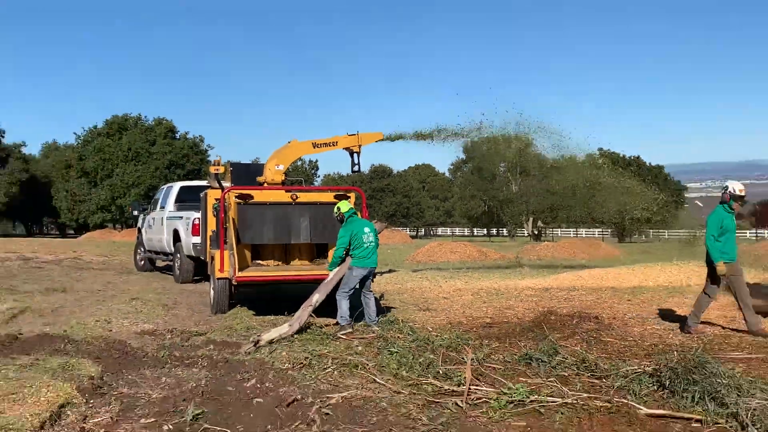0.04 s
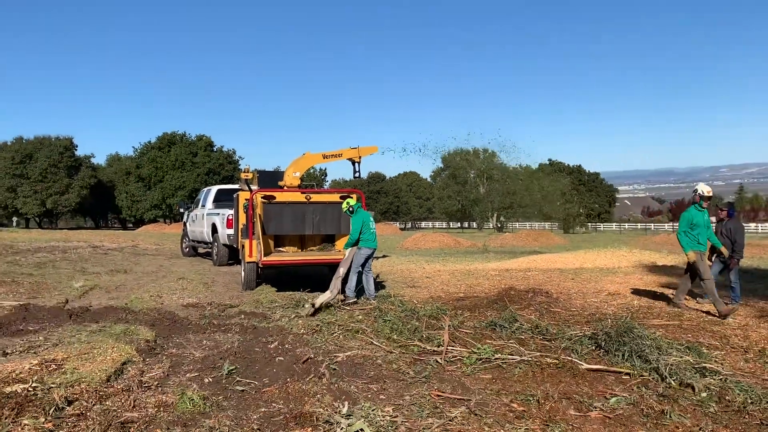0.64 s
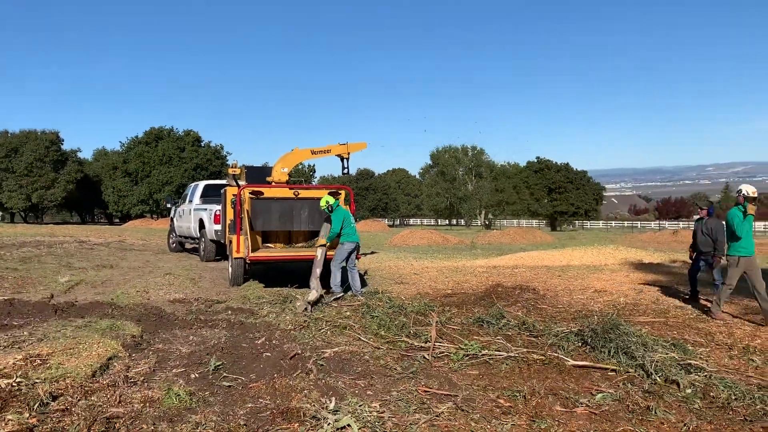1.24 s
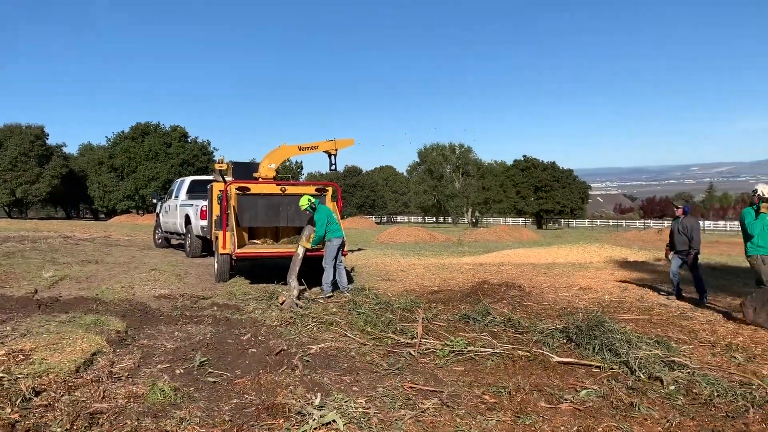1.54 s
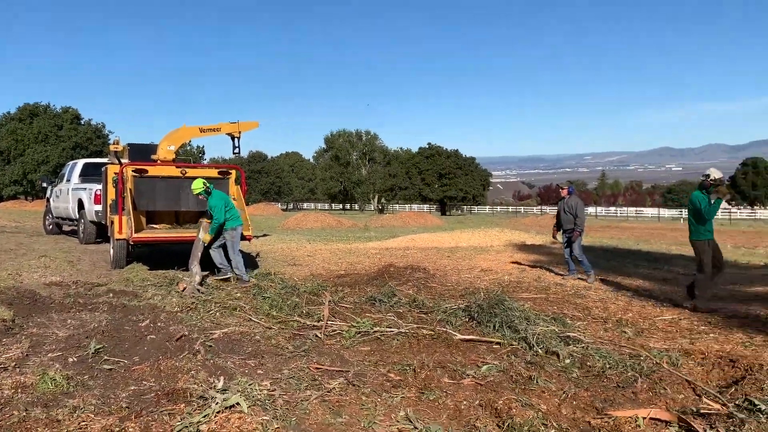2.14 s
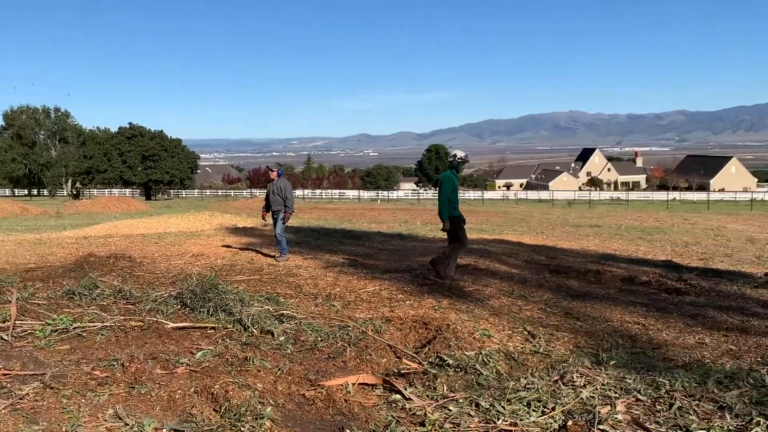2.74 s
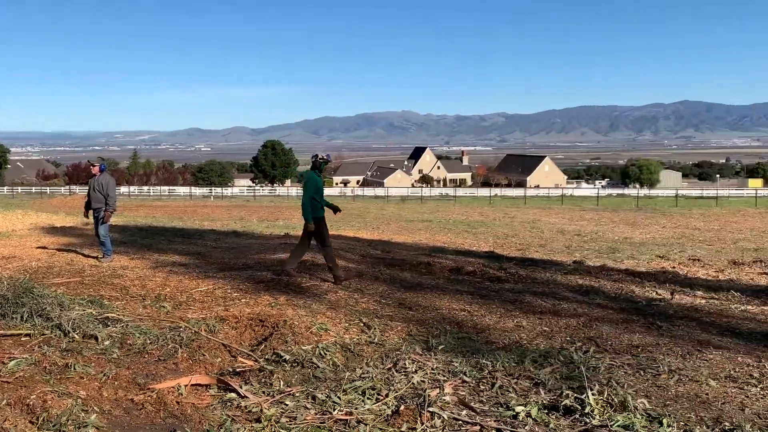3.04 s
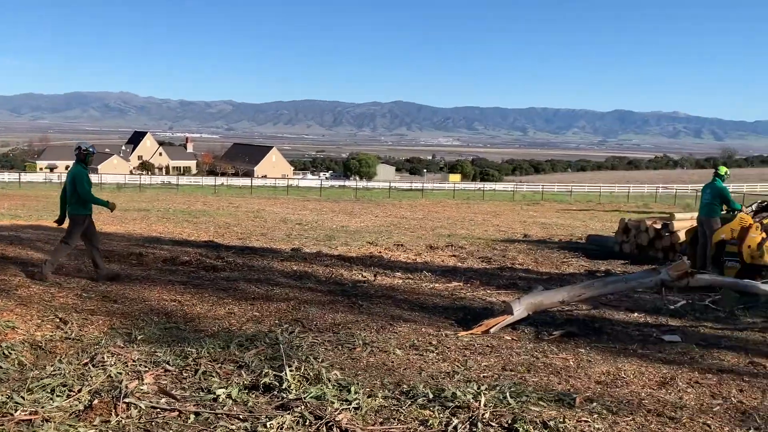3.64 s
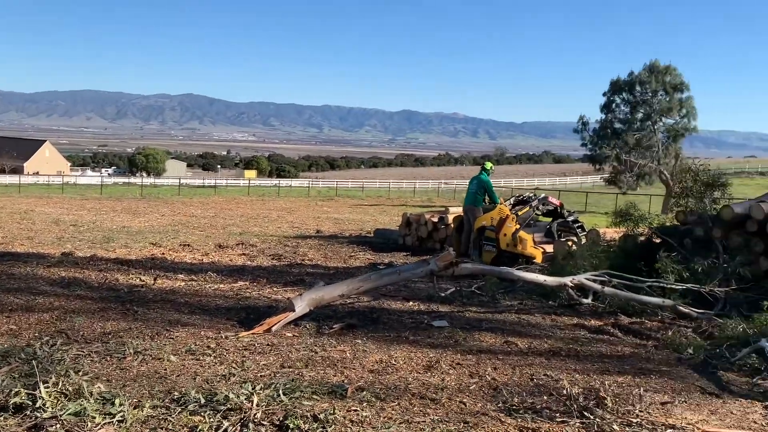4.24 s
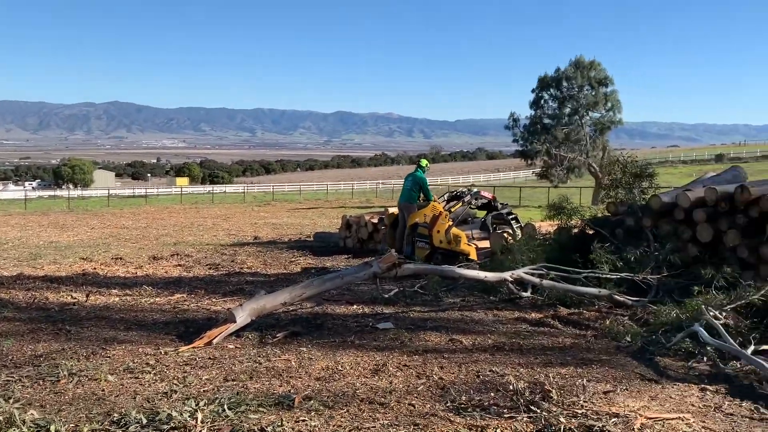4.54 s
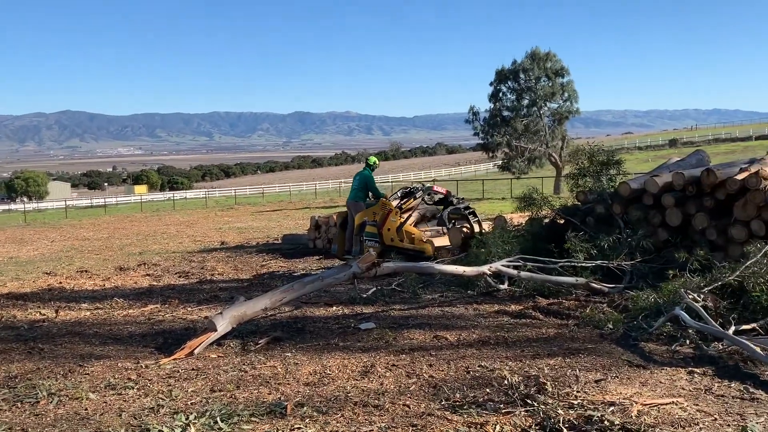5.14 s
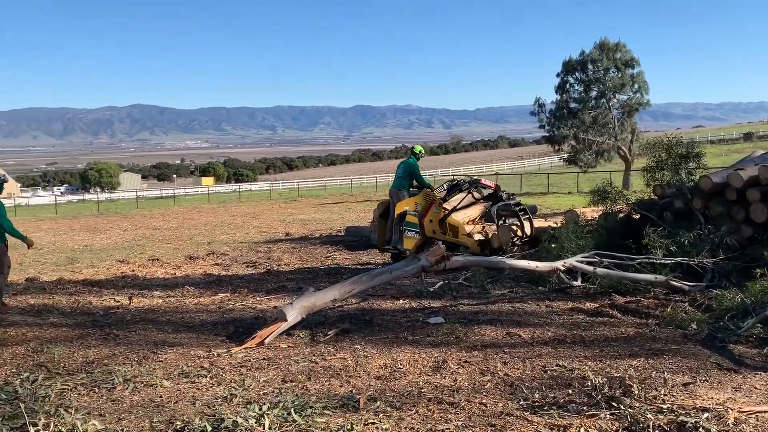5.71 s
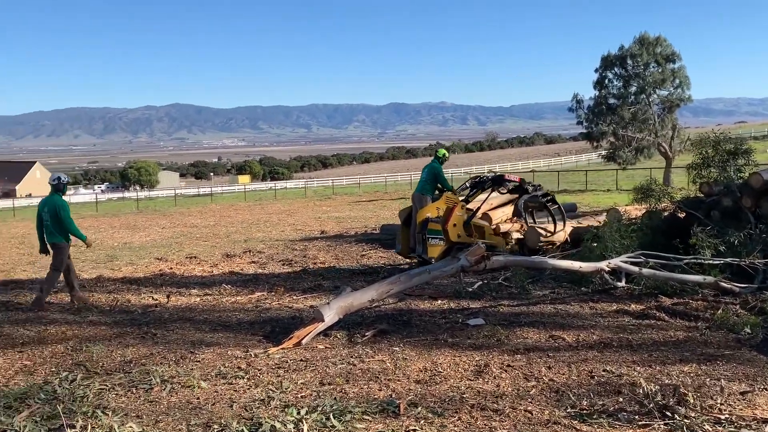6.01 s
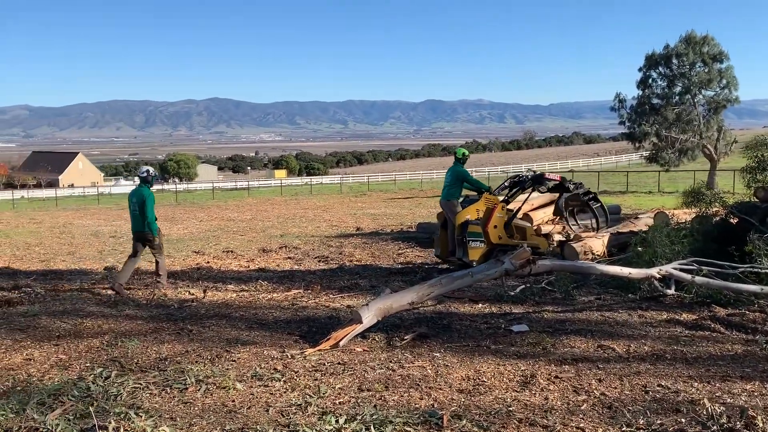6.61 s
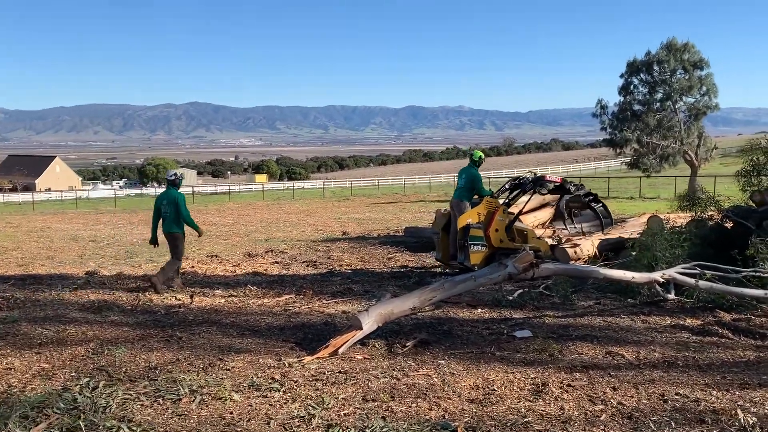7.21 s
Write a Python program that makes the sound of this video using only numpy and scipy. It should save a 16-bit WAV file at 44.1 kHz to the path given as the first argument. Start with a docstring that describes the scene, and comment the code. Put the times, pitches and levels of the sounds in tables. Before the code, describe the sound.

A diesel wood chipper drones steadily outdoors, briefly shredding wood, while a small loader growls, clanks and knocks logs together.

```python
"""A diesel wood chipper runs in an open field: its exhaust drones, its engine knocks, its fan hums
and its panels rattle. The last chips hiss out of the chute, wood is shredded, and twigs crackle.
A small loader works nearby, growling, clanking and knocking logs together, then drives closer.
The listener turns to the right, away from the chipper, so its sound reaches the right ear
later and later."""
import sys
import numpy as np
from scipy import signal
from scipy.fft import rfft, irfft
from scipy.io import wavfile

SR = 44100
rng = np.random.default_rng(int(sys.argv[2]) if len(sys.argv) > 2 else 0)


def bounce(signal):
    """Save signal as a 16-bit WAV file at the path given by the first command-line argument."""
    frames = np.transpose(np.atleast_2d(signal))
    limited = np.clip(frames, -1, 1)
    pcm = np.round(limited * 32767).astype(np.int16)
    wavfile.write(sys.argv[1], SR, pcm)


N = 320607
TIME = np.arange(N) / SR
FREQS = np.maximum(np.arange(N // 2 + 1) * SR / N, 1)

# how hard each of the chipper's four cylinders fires: level/dB
CYLINDER_FORCE = [4.9, 2, 2.3, 0.59]
# tone colour of dry wood snapping: f/Hz, level/dB
SNAP_COLOUR = [(800, -2), (2500, 17), (6000, 4), (10000, 10.5), (14000, 0)]

TURN_AT_S, TURN_EASE_S = 2.66, 0.27   # middle of the listener's turn, and how gradual it is
FACE_AT_S, FACE_EASE_S = 4.17, 0.064   # the turn ends facing the loader
DRIVE_AT_S, DRIVE_EASE_S = 5.3, 0.059   # the loader drives off towards the listener


def from_db(db):
    """Turn decibels into a gain."""
    return 10 ** (np.asarray(db) / 20)


def rms_one(x):
    """Scale a signal to an average strength (rms) of 1."""
    return x / np.sqrt(np.mean(x ** 2) + 1e-20)


def over_hz(points, at_hz=FREQS):
    """Join a table's points by straight lines along a pitch scale."""
    hz, value = np.transpose(points)
    return np.interp(np.log(at_hz), np.log(hz), value)


def in_time(rows, time=TIME):
    """Join each column of a table by straight lines in time."""
    row_s, *columns = np.transpose(rows)
    return [np.interp(time, row_s, column) for column in columns]


def step(at_s, ease_s, time=TIME):
    """A smooth change from 0 to 1, half done at at_s."""
    return .5 + .5 * np.tanh((time - at_s) / (2 * ease_s))


def hump(at_s, half_s, time=TIME):
    """A smooth rise and fall of height 1."""
    return np.exp(-np.square((time - at_s) / half_s))


def swell(at_s, rise_s, decay_s):
    """A quick rise that peaks at at_s and dies away."""
    return np.exp(-np.maximum((at_s - TIME) / rise_s, 0) ** 2 - np.maximum(TIME - at_s, 0) / decay_s)


def tone(cycles):
    """A pure tone of rms 1 that follows a running count of cycles."""
    return np.sqrt(2) * np.cos(2 * np.pi * cycles)


def colour(x, spectrum):
    """Filter a sound by a table of f/Hz, level/dB."""
    return irfft(rfft(x) * from_db(over_hz(spectrum)), N)


def resonate(x, modes):
    """Make a sound ring at a body's own notes, added with alternating signs; rms 1."""
    rings = (from_db(db) * signal.lfilter(*signal.iirpeak(hz, hz / width, fs=SR), x)
             for hz, width, db in modes)
    return rms_one(sum((-1) ** k * ring for k, ring in enumerate(rings)))


def drift(rate_hz):
    """A random wander of rms 1 that changes up to about rate_hz times a second."""
    return rms_one(irfft(rfft(rng.standard_normal(N)) / (1 + (FREQS / rate_hz) ** 2), N))


def wavering():
    """Moving air makes a far tone swell and sink."""
    return 1 + .3 * drift(3)


def grains(per_s, spread_db, length_s):
    """The loudness outline of many tiny impacts of uneven size; rms 1."""
    sizes = from_db(spread_db * np.minimum(rng.exponential(1, N), 4))
    power = (sizes * (rng.random(N) < per_s / SR)) ** 2
    fading = signal.lfilter([1], [1, -np.exp(-1 / (length_s * SR))], power + 1e-18)
    return rms_one(np.sqrt(fading))


def air_noise():
    """White noise at two ears; sound scattered by the ground makes them less alike in the treble."""
    # share of the sound that arrives directly: f/Hz, left-right likeness/0-1
    likeness = [(40, 1), (150, .95), (450, .87), (750, .82), (1200, .88), (2300, .86), (2750, .66),
                (3200, .8), (4300, .84), (4900, .45), (5500, .5), (7500, .12), (14000, .15)]
    alike = over_hz(likeness)
    mid, side = rfft(rng.standard_normal((2, N)))
    ears = np.sqrt(1 + alike) * mid + np.sqrt(1 - alike) * side * [[1], [-1]]
    return irfft(ears, N) * np.sqrt(SR) / 2


def turned(time=TIME):
    """How far the listener has turned, from 0 to 1."""
    return step(TURN_AT_S, TURN_EASE_S, time)


def driven_s():
    """Seconds for which the loader has been driving nearer."""
    return np.maximum(TIME - DRIVE_AT_S, 0)


def layer_db(start_db, turn_db, drive_db, db_per_s):
    """A level that shifts as the listener turns, as the loader sets off, and as it nears."""
    driving = step(DRIVE_AT_S, DRIVE_EASE_S)
    return start_db + turn_db * turned() + drive_db * driving + db_per_s * driven_s()


def litter():
    """Dry leaves and bark crackle as they land or are driven over."""
    # spells of crackling: t/s, half length/s, level/dB
    spells = [(.12, 0.39, -52), (5.48, 0.4, -56), (7.0, .38, -52.5)]
    level = sum(from_db(db) * hump(at, half_s) for at, half_s, db in spells)
    cracks = grains(per_s=400, spread_db=2, length_s=.002)
    return level * rms_one(colour(air_noise() * cracks, SNAP_COLOUR))


def twigs(rise_s=0.0036, decay_s=0.016):
    """Each twig snaps in a short cluster of breaking fibres."""
    # the snaps: t/s, level/dB
    snaps = [(0.801, -44), (1.336, -43), (1.747, -47), (2.18, -50), (2.793, -49), (3.548, -50), (5.28, -46),
             (5.4, -52), (5.534, -44), (5.603, -47), (6.014, -50), (6.06, -42), (6.863, -48.5),
             (6.952, -54.5)]
    level = sum(from_db(db) * swell(at, rise_s, decay_s) for at, db in snaps)
    breaks = grains(per_s=2500, spread_db=1.5, length_s=.001)
    return level * rms_one(colour(air_noise() * breaks, SNAP_COLOUR))


def logs(rise_s=0.0011):
    """Logs knock together at the loader and ring, hollow and brief."""
    # the knocks: t/s, level/dB
    knocks = [(2.77, -36), (3.648, -40), (5.978, -37), (6.134, -27), (6.145, -22.5)]
    # a log's own notes: f/Hz, time to fade by 60 dB/s, level/dB
    log_notes = [(829, .05, 0), (935, .025, -5), (1360, .04, -5), (1760, .03, -7)]
    since = TIME[:SR // 4]
    out = np.zeros(N + SR)
    for at, db in knocks:
        ring = sum(from_db(db + note_db - 60 * since / fade_s) * tone(hz * since + rng.random())
                   for hz, fade_s, note_db in log_notes)
        start = int(at * SR)
        out[start:start + len(since)] += ring * (1 - np.exp(-since / rise_s))
    return out[:N]


def loader_clanks(rise_s=.016, decay_s=.03):
    """The loader's steel panels knock together as it jerks into motion."""
    # the clanks: t/s, level/dB
    clanks = [(5.238, -33), (5.292, -38), (5.99, -43), (6.75, -42)]
    # ring of a clank: f/Hz, width/Hz, level/dB
    clank_ring = [(1900, 260, 0), (2400, 350, 0), (3000, 450, -6)]
    level = sum(from_db(db) * swell(at, rise_s, decay_s) for at, db in clanks)
    return level * resonate(air_noise(), clank_ring)


def loader_growl(firings, throb=0.42, nearing_db_per_s=1):
    """Exhaust puffs growl through the loader's silencer and boom in its pipe under load."""
    # the loader takes up load: t/s, half length/s, effort/0-1
    lifts = [(3.794, 0.36, 0.3), (6.733, 0.15, 0.91), (7.1, 0.14, 0.87)]
    # ring of the silencer and of the pipe: f/Hz, width/Hz, level/dB
    silencer_ring = [(418, 167, -7.5), (611, 113, 0), (684, 99, -1.5)]
    pipe_ring = [(207, 32, -8.5), (247, 12, -8.5)]
    effort = sum(strength * hump(at, half_s) for at, half_s, strength in lifts)
    puffs = air_noise() * (1 + throb * tone(firings))
    growl_db = -37.5 + 2.5 * effort + nearing_db_per_s * driven_s()
    boom = from_db(-29) * effort * resonate(puffs, pipe_ring)
    return from_db(growl_db) * resonate(puffs, silencer_ring) + boom


def loader_pump():
    """The hydraulic pump's hum rises and falls as it speeds up and slows."""
    # the pump's note: t/s, f/Hz, level/dB
    pump_note = [(2.8, 302.8, -41), (3.2, 307, -35), (3.55, 332, -40), (3.9, 334, -45), (4.3, 307.4, -38),
                 (4.65, 323.7, -35), (5.4, 317.8, -34.5), (5.8, 324.4, -34), (6.1, 331, -38),
                 (6.45, 322.4, -35), (6.9, 332, -50), (7.12, 325.2, -32), (7.27, 314, -36)]
    hz, db = in_time(pump_note)
    return from_db(db) * tone(np.cumsum(hz + drift(16)) / SR)


def loader(turns, tone_db, beat_hz=1.965, beat_at_s=.122):
    """Its engine fires a little faster than the chipper's, so the two throb against each other."""
    firings = 2 * turns + beat_hz * (TIME - beat_at_s) + 0.022 * drift(8.4)
    engine = from_db(-32.5) * tone(firings) + from_db(-48.5) * tone(3 * firings)
    working = loader_growl(firings) + loader_pump()
    return engine * from_db(tone_db) + turned() ** 2 * working


def panel_rattle():
    """Loose panels chatter on the chipper, heard after the turn and growing louder."""
    # ring of the panels: f/Hz, width/Hz, level/dB
    panel_ring = [(1706, 44, 4.5), (1960, 340, 4), (2530, 450, 4.5), (4020, 250, -5.5)]
    taps = grains(per_s=260, spread_db=1.3, length_s=.004) * from_db(1.3 * drift(15))
    level = from_db(-48 + 5 * step(DRIVE_AT_S, DRIVE_EASE_S)) * turned() ** 4
    return level * taps * resonate(air_noise(), panel_ring)


def overspeed(start_hz=.66, swing_s=4.1, settle_s=1.35):
    """The chipper's extra turns per second, which its speed governor pulls back in a fading swing."""
    return start_hz * np.exp(-TIME / settle_s) * np.cos(2 * np.pi * TIME / swing_s)


def chips_left():
    """The flow of chips, falling to 0 as the last ones leave the chute."""
    return 1 - step(at_s=0.085, ease_s=0.12)


def draught():
    """With the chips gone, the drum blows a thin, gusty hiss out of the chute."""
    # tone colour of the whistling air: f/Hz, level/dB
    whistle_colour = [(4500, -20), (5600, -3), (6300, 19), (7400, 17), (8600, -20)]
    level = from_db(-56 + 1.1 * drift(9)) * hump(at_s=1.7, half_s=0.54)
    return level * rms_one(colour(rng.standard_normal(N), whistle_colour))


def chip_ticks(rise_s=0.0068, decay_s=0.014):
    """Stray chips ping off the chute's steel lip."""
    # the hits: t/s, level/dB
    hits = [(.115, -43), (.225, -46)]
    # ring of the lip: f/Hz, width/Hz, level/dB
    lip_ring = [(3300, 400, -15), (4740, 280, 9.5)]
    level = sum(from_db(db) * swell(at, rise_s, decay_s) for at, db in hits)
    return level * resonate(air_noise(), lip_ring)


def chute(patter_share=0.27):
    """Air rushes from the chute, with chips and leaves pattering in it."""
    # tone colour of the rushing air: f/Hz, level/dB
    hiss_colour = [(1500, -100), (3200, -91.5), (4100, -95.5), (5200, -91), (6300, -90), (7500, -98),
                   (9500, -96), (13500, -102), (15000, -108)]
    chips = grains(per_s=350, spread_db=2.5, length_s=.001)
    patter = np.sqrt(1 - patter_share + patter_share * chips ** 2)
    level_db = layer_db(0.15, turn_db=.1, drive_db=1.5, db_per_s=0.21) + 13.5 * chips_left()
    return from_db(level_db + 0.17 * drift(13)) * colour(air_noise() * patter, hiss_colour)


def rumble():
    """The machines' deep noise, stronger while chips still leave the chute."""
    # tone colour of the rumble: f/Hz, level/dB
    rumble_colour = [(20, -99), (32, -90), (45, -71), (58, -50), (85, -55.5), (140, -49.5), (240, -56),
                     (325, -57.5), (420, -66), (700, -82.5), (2000, -110)]
    level_db = layer_db(-0.84, turn_db=1.4, drive_db=0.68, db_per_s=0.84) + 4 * chips_left()
    return from_db(level_db) * colour(air_noise(), rumble_colour)


def fan(turns, blades_per_turn=9.454):
    """The belt-driven fan hums as its blades pass; its overtones dull as the listener turns."""
    # the hum swells and sinks: t/s, level/dB
    hum_level = [(0, -36.5), (.97, -43), (1.13, -35), (1.76, -37.5), (1.9, -39), (2.08, -38), (2.55, -34),
                 (2.75, -43), (3.58, -38.5), (3.74, -32), (3.96, -30.5), (4.06, -41.5), (7.27, -37)]
    # the fan's overtones: multiple of the blade rate, level/dB
    fan_overtones = [(2, -46), (3, -45.5), (5, -52)]
    blades = blades_per_turn * turns
    hum_db, = in_time(hum_level)
    tilt_db = -2.5 * turned()
    overtones = sum(from_db(db + tilt_db * (k - 3)) * tone(k * blades + rng.random()) * wavering()
                    for k, db in fan_overtones)
    return from_db(hum_db) * tone(blades) + overtones


def drum(turns):
    """The cutting drum whines in step with the engine at first, while it runs fast and empty."""
    whine = tone(32 * turns) + from_db(-7) * tone(24 * turns)
    return from_db(-41.5) * (1 - step(at_s=.68, ease_s=.06)) * whine * wavering()


def cracking_bursts(bright_s=0.065):
    """Rough cracking: wood shredded early on, later the crunch of a clank and of logs knocking."""
    # the bursts: t/s, rise/s, decay/s, level/dB, bright cracks against the ring/dB
    bursts = [(.115, .012, .025, -39, -7), (1.316, .013, .045, -29.5, -5), (1.335, .014, .09, -29, -11),
              (1.4, .03, .06, -35.5, -13), (1.612, .016, .075, -34.5, -10), (5.238, .015, .06, -40, -5),
              (5.98, .01, .02, -40, -8), (6.142, .012, .025, -33.5, -8)]
    # tone colour of the bright cracks: f/Hz, level/dB
    crack_colour = [(300, -13), (750, 11.5), (1700, 3), (2900, 6.5), (4200, 11), (5400, 1.5), (6600, 4),
                    (8000, -6.5), (10000, 1), (15000, -32)]
    # ring of the drum's steel hood, used for every burst: f/Hz, width/Hz, level/dB
    burst_ring = [(520, 260, -6), (895, 110, 2.5), (1270, 270, -1.5), (1660, 450, 0.5), (2450, 210, -5)]
    crunch = air_noise() * grains(per_s=1500, spread_db=2, length_s=.0015)
    cracks = rms_one(colour(crunch, crack_colour))
    ring = resonate(crunch, burst_ring)
    out = np.zeros((2, N))
    for at, rise_s, decay_s, db, bright_db in bursts:
        bright = from_db(bright_db) * cracks * np.exp(-np.maximum(TIME - at, 0) / bright_s)
        out += from_db(db) * swell(at, rise_s, decay_s) * (ring + bright)
    return out


def clatter(turns, jitter_turns=0.002):
    """Each squirt of fuel is a sharp tap on the engine's steel: the diesel rasp."""
    # ring of the steel: f/Hz, width/Hz, level/dB
    steel_ring = [(1670, 57, 2), (1780, 25, 3.5), (2150, 200, -4), (4020, 120, -12.5), (4250, 81, -14.5)]
    firing = np.floor(2 * (turns + jitter_turns * drift(78))).astype(int)
    force = from_db(np.take(CYLINDER_FORCE, firing, mode="wrap") + 2 * drift(30))
    taps = np.diff(firing, prepend=firing[0]) * force
    level_db = layer_db(-55.5, turn_db=0.5, drive_db=2, db_per_s=1.5)
    return from_db(level_db) * resonate(taps + 1e-18, steel_ring)


def knock(turns, gear_rattle=.3):
    """Each firing makes the engine block ring with a burst of noise, over a steady gear rattle."""
    # ring of the block: f/Hz, width/Hz, level/dB
    block_ring = [(651, 112, 6), (989, 72, 6), (1166, 45, 1), (1658, 110, -2.5), (2280, 390, -9),
                  (3480, 30, -12), (3980, 120, -15.5), (6070, 260, -21)]
    firing, progress = np.divmod(2 * turns, 1)   # two firings per turn
    force = from_db(np.take(CYLINDER_FORCE, firing.astype(int), mode="wrap"))
    bursts = gear_rattle + force * np.exp(-progress / .35)
    return from_db(-38.5) * resonate(air_noise() * bursts, block_ring)


def roar(turns, labour_db_per_hz=3.5):
    """Broad noise and engine knock, louder as the engine slows and labours."""
    # tone colour of the roar: f/Hz, level/dB
    roar_colour = [(200, -74.5), (480, -67.5), (680, -70.5), (820, -64), (1050, -64.5), (1450, -69),
                   (2200, -74), (2900, -80.5), (4200, -84), (5200, -94.5), (8000, -99), (15000, -112)]
    level_db = layer_db(-2.2, turn_db=-0.14, drive_db=0.95, db_per_s=0.023)
    level_db += 8.5 * chips_left() - labour_db_per_hz * overspeed()
    level_db += 2 * step(FACE_AT_S, FACE_EASE_S)
    return from_db(level_db) * (colour(air_noise(), roar_colour) + knock(turns))


def exhaust(turns, tone_db, flutter=0.09, labour_db_per_hz=20):
    """The chipper's four cylinders puff out a deep drone, whose high tones waver in the air."""
    # tones of the exhaust: multiple of the engine speed, level/dB
    exhaust_tones = [(2, -33.5), (3, -45), (4, -18.5), (6, -37), (7, -51.5), (10, -48.5), (12, -46.5),
                     (13, -53), (14, -58), (16, -47.5), (17, -52), (18, -47.5), (19, -56.5), (20, -52.5),
                     (21, -53.5), (22, -53), (23, -52.5), (24, -51), (28, -54), (30, -54.5), (32, -59),
                     (34, -47.5), (36, -50.5), (49, -62.5), (50, -63)]
    # the tone an octave above the strongest one: t/s, level/dB
    octave_level = [(0.0, -26), (0.04, -30.5), (1.68, -38.5), (1.96, -31.5), (4.15, -32.5), (4.33, -37),
                    (4.53, -33.5), (7.23, -27), (7.27, -36)]
    # the lowest tone has no random offset, which sets the timing of its throb with the loader
    low = sum(from_db(db) * tone(k * turns + rng.random() * (k > 2))
              for k, db in exhaust_tones if k < 13)
    # tones above the 18th fade as the listener turns and grow as the engine labours
    tilt_db = -7 * turned() ** 2 - labour_db_per_hz * overspeed()
    high = sum(from_db(db + tilt_db * max(k / 18 - 1, 0)) * tone(k * turns + rng.random()) * wavering()
               for k, db in exhaust_tones if k > 13)
    octave_db, = in_time(octave_level)
    octave = from_db(octave_db) * tone(8 * turns + rng.random())
    return low * from_db(tone_db) * (1 + flutter * drift(11)) + octave + high


def gliding(path, hz, time, width_octaves=.16):
    """Gain in dB of one peak or dip that slides in pitch."""
    centre_hz, db = in_time(path, time)
    return db * np.exp(-np.square(np.log2(hz / centre_hz) / width_octaves))


def turning_head(sound, lag_before_ms=0.088, lag_after_ms=0.463, balance_db=0.7):
    """Turning delays the right ear and slides peaks and dips through what each ear hears."""
    # extra difference between the ears while facing the chipper: f/Hz, level/dB
    scatter = [(1800, 1.5), (2500, -4), (3300, 17), (4300, 3), (5500, 1.5)]
    # how far direct sound outweighs that scatter as the chipper passes the ear: f/Hz, level/dB
    clearing = [(800, 0), (1400, 2), (2400, 1), (3800, 7), (5400, 9), (6300, 0)]
    # treble lifted while side-on to the chipper: f/Hz, weight
    side_lift = [(2400, 0), (3100, 1.3), (4900, 0.71), (6000, 0)]
    # a peak that climbs as the chipper passes the ear: t/s, f/Hz, level/dB
    climbing_peak = [(2.1, 2300, 2), (2.5, 2470, 7), (2.8, 3200, 6.5), (3.1, 4270, 6.5), (3.5, 4270, 0.5),
                     (4.4, 4200, 0.5)]
    # dips that slide with the sound's direction, at each ear and at both: t/s, f/Hz, level/dB
    left_dip = [(0, 3440, -6), (1.9, 3500, -3), (2.25, 4000, -7), (2.5, 5200, -3), (2.7, 6600, 1),
                (3.3, 7500, -5), (5.3, 7500, 5)]
    right_dip = [(0, 2400, -5), (.45, 2250, -8), (.75, 2680, -7), (.95, 3200, -9), (2.3, 3420, -5),
                 (2.6, 3300, -3)]
    shared_dip = [(2.5, 3100, -8), (2.9, 2870, -3.5), (3.3, 2380, -5), (3.7, 2400, -11), (4.1, 2420, -3),
                  (4.4, 2450, -5.5)]
    # each band takes its own way round the head: f/Hz, how late it follows the turn/s
    ear_paths = [(1000, 0), (1450, -.13), (2200, -.2), (2600, -.16), (3300, .15), (4400, .13), (5500, .04)]
    hz, time, ears = signal.stft(sound, SR, nperseg=512, noverlap=384)
    hz = np.maximum(hz, 1)[:, None]
    away = turned(time)
    passing = hump(at_s=2.85, half_s=.5, time=time)
    side_on = away ** 3 * (1 - step(FACE_AT_S, FACE_EASE_S, time))
    mid, side = ears.mean(axis=0), (ears[0] - ears[1]) / 2
    side *= from_db(over_hz(scatter, hz) * (1 - away) - over_hz(clearing, hz) * passing)
    both_db = 3 * side_on * over_hz(side_lift, hz)
    both_db += gliding(climbing_peak, hz, time, width_octaves=.36) + gliding(shared_dip, hz, time)
    band_turned = step(TURN_AT_S + over_hz(ear_paths, hz), TURN_EASE_S, time)
    lag_ms = lag_before_ms + (lag_after_ms - lag_before_ms) * band_turned
    delay = np.exp(-2j * np.pi * hz * lag_ms / 1000)
    left = (mid + side) * from_db(both_db + gliding(left_dip, hz, time))
    right = (mid - side) * from_db(both_db + gliding(right_dip, hz, time)) * delay
    heard = signal.istft(np.array([left, right]), SR, nperseg=512, noverlap=384)[1][:, :N]
    return heard * from_db(balance_db * (turned() - 1) * [[-.5], [.5]])


def scene(governed_hz=35.64):
    """Both machines and the wood, heard by two ears that turn; the logs lie straight ahead."""
    turns = np.cumsum(governed_hz + overspeed()) / SR   # running count of the chipper engine's turns
    tone_db = layer_db(-1.1, turn_db=0.6, drive_db=0.35, db_per_s=1.46)   # both engines' low tones
    machines = exhaust(turns, tone_db) + fan(turns) + drum(turns)
    machines = machines + loader(turns, tone_db) + panel_rattle() + clatter(turns)
    noises = rumble() + roar(turns) + chute() + draught()
    impacts = chip_ticks() + loader_clanks() + cracking_bursts() + twigs() + litter()
    return turning_head(machines + noises + impacts) + logs()


def record(dry, fade_s=.004, cutoff_hz=14300):
    """The two sides differ in tone colour, and the highest treble is cut."""
    # left ear against right ear: f/Hz, level/dB
    ear_balance = [(60, 2), (99, -10), (160, -1.5), (270, -3), (440, 0), (730, 0.5), (1200, -1),
                   (1980, -1.5), (3260, -1), (5370, -1), (8850, -3), (14600, 1)]
    fade = np.minimum(np.minimum(TIME, TIME[::-1]) / fade_s, 1)
    ears = irfft(rfft(dry * fade) * from_db(over_hz(ear_balance) * [[.5], [-.5]]), N)
    return signal.sosfilt(signal.ellip(10, .1, 80, cutoff_hz, fs=SR, output="sos"), ears)


dry = scene()
out = record(dry)
bounce(out)
```